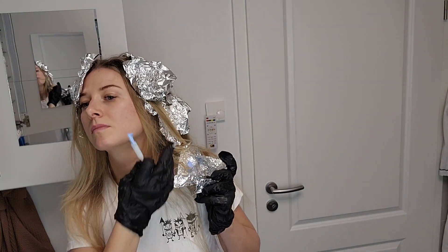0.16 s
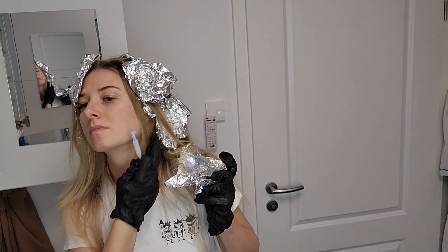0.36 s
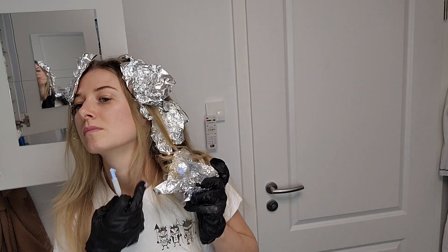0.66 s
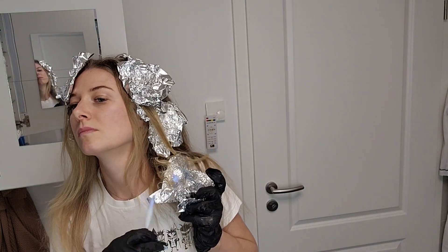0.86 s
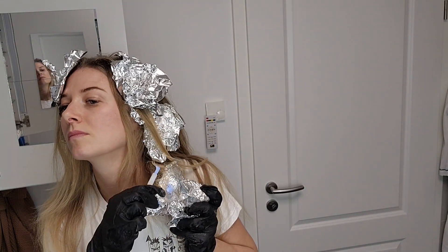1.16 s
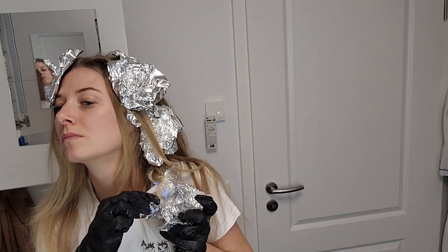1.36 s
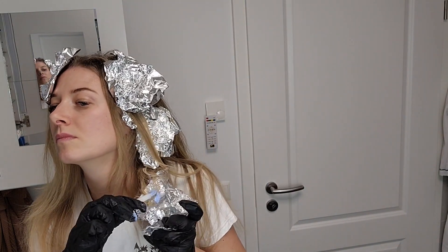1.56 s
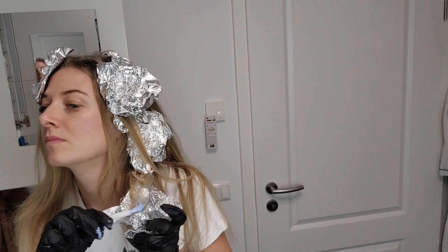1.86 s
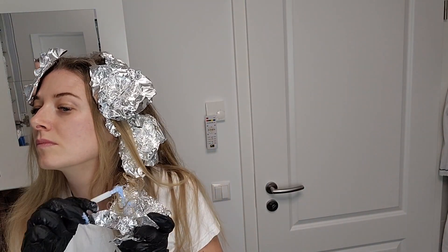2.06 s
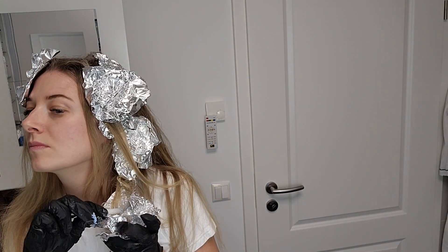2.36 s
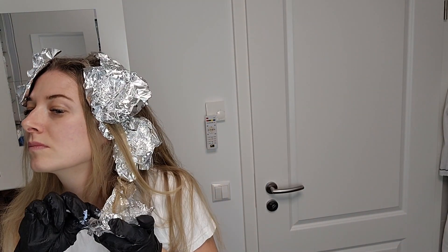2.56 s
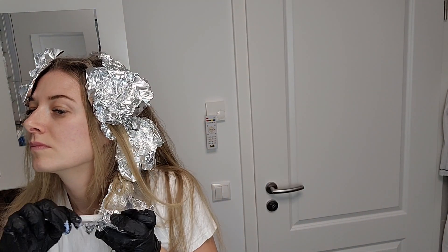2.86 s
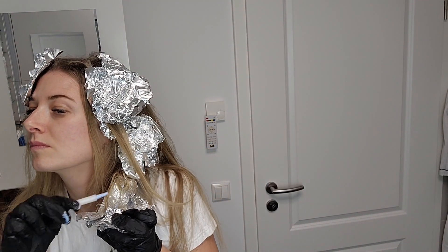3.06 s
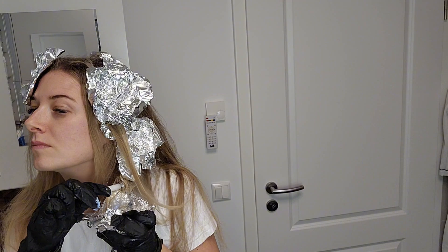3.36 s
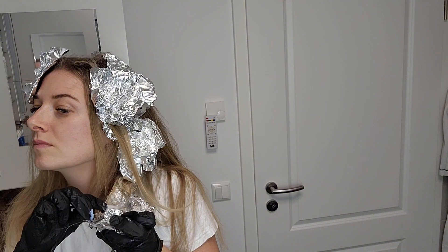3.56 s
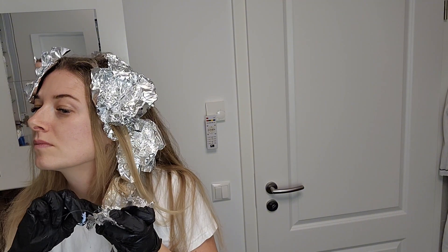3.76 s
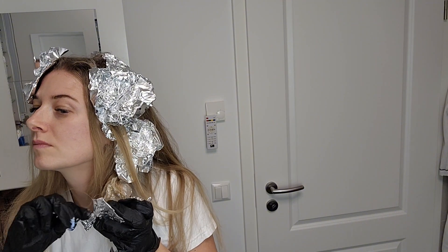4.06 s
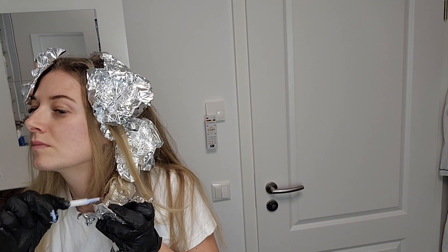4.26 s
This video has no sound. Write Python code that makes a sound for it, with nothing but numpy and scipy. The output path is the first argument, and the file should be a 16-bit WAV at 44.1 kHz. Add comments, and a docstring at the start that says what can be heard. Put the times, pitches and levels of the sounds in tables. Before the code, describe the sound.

Aluminium foil is folded by gloved fingers near the microphone. After one early crumple and a soft glove rustle, it falls almost silent; then crisp snaps start, build to a busy crackling peak, drop out briefly, and return in uneven bursts. Short room reflections, quiet air hiss, and a barely audible low hum at the very end.

```python
"""In a small bare room, gloved hands fold a crumpled aluminium foil packet.
Thousands of creases buckle: random clicks ring facets, wide ones popping low, fine wrinkles ticking high.
The sharpest snaps stand out alone as noise bursts; pressing fingers thud as lumpy low noise, and early on
a glove or sleeve rubs with a low soft rustle, made from the same broad folds and low noise.
A low sine hum swells twice at the end, the walls answer briefly in decaying noise, and quiet air hisses."""
import sys
import numpy as np
from scipy import signal
from scipy.fft import rfft, irfft
from scipy.io import wavfile
from scipy.ndimage import uniform_filter1d

SR = 44100
rng = np.random.default_rng(int(sys.argv[2]) if len(sys.argv) > 2 else 0)


def file_out(sig):
    """Save sig as 16-bit WAV at sys.argv[1]."""
    # one column per channel
    cols = np.atleast_2d(sig).T
    # limit, then scale
    lim = np.clip(cols, -1, 1)
    pcm = np.round(lim * 32767).astype(np.int16)
    wavfile.write(sys.argv[1], SR, pcm)


N = 195447
GESTURE_STEP = 64   # samples between two values of a gesture curve


def from_db(db):
    """Gain of a level in dB."""
    return 10 ** (np.asarray(db) / 20)


def rms_one(x):
    """Scaled to rms 1."""
    return x / np.sqrt(np.mean(x ** 2) + 1e-20)


def in_time(rows):
    """Columns of a curve table, joined by straight lines, one value a sample."""
    s, *columns = np.transpose(rows)
    t = np.arange(N) / SR
    return [np.interp(t, s, column) for column in columns]


def at_hz(points, hz):
    """A spectrum read on a log-frequency axis."""
    points_hz, values = np.transpose(points)
    return np.interp(np.log(hz), np.log(points_hz), values)


def drift(rate_hz):
    """Slow random wander with spread 1: noise through two equal low-pass poles, drawn every 40 samples."""
    step, settle = 40, 2000
    r = np.exp(-2 * np.pi * rate_hz * step / SR)
    noise = rng.standard_normal(N // step + 2 + settle)
    slow = signal.lfilter([1], [1, -2 * r, r * r], noise)[settle:]
    return np.interp(np.arange(N) / step, np.arange(len(slow)), rms_one(slow))


def band(x, low_hz, high_hz):
    """Butterworth band-pass."""
    edges_hz = [low_hz, min(high_hz, .45 * SR)]
    return signal.sosfilt(signal.butter(2, edges_hz, "band", fs=SR, output="sos"), x)


def air():
    """The quiet room and the microphone's own hiss: steady noise shaped by a spectrum."""
    # colour of the hiss: pitch_hz [Hz], level_db [dB per Hz, relative]
    air_colour = [(30, -5), (100, 6), (250, 2), (630, -6), (1200, -8.5), (2500, -5.5), (4500, -2),
                  (9000, -10.5), (13000, -16), (16000, -23)]
    level_db = -75.5   # rms
    hz = np.maximum(np.fft.rfftfreq(N, 1 / SR), 10)
    shaped = rfft(rng.standard_normal(N)) * from_db(at_hz(air_colour, hz))
    return from_db(level_db) * rms_one(irfft(shaped, N))


def swells(rows, rise_db_per_s):
    """Power of each gesture over time: a steady rise in dB, a hold, then its own fade in dB."""
    full_s, hold_s, fade_s = np.transpose(rows)[:3, :, None]
    t = np.arange(0, N + GESTURE_STEP, GESTURE_STEP) / SR
    rising_db = rise_db_per_s * (full_s - t)
    fading_db = 20 * (t - full_s - np.abs(hold_s)) / np.maximum(fade_s, .005)
    below_db = np.maximum(rising_db, fading_db)
    return from_db(-2 * np.clip(below_db, 0, 150))   # twice the dB turns gain into power


def per_sample(slow):
    """From gesture steps to every sample."""
    return np.interp(np.arange(N) / GESTURE_STEP, np.arange(len(slow)), slow)


def handling():
    """Overlapping gestures add in power; the louder a crumple, the more it pulls the busiest pitch."""
    # fingers crumple the foil: full_s [s at full strength], hold_s [s],
    # fade_s [s to fall 20 dB, 0.005 at least], middle_db [dB, middle creases],
    # fine_db, wide_db [dB against the middle creases], busy_hz [Hz, loudest facets]
    crumple_moves = [(0.0, 0.00087, 0.07, -46, -14, -22, 3000), (0.053, 0.0087, 0.17, -40, -20, -28, 2500),
                     (0.073, 0.0083, 0.0839, -35.5, -11.5, -19.5, 2370),
                     (0.115, 0.02, 0.34, -65, -9, -2, 3200), (0.295, .01, .03, -51, -3, -5, 4900),
                     (0.317, .01, .03, -36, -1.5, -4.5, 3180), (.33, 0.0011, 0.0541, -28.5, 0, -1.5, 2940),
                     (0.347, 0.05, 0.1549, -39.5, -2, -3.5, 3580),
                     (0.549, 0.056, 0.17, -50.5, -32, -30, 3400),
                     (0.727, 0.14, -0.1, -66.5, -8.5, -29, 3530),
                     (0.875, 0.068, 0.1, -64.5, -6.5, -28, 2400), (1.066, 0.024, 0.1, -66, -12, -14, 3940),
                     (1.162, .001, .03, -62, -12, -17, 3900), (1.186, .001, 0.2, -62, 16.5, -4, 8900),
                     (1.267, 0.011, 0.06, -51.5, 4.5, 4, 6600), (1.31, .025, .03, -61, 9.5, 9, 7660),
                     (1.355, 0.071, 0.96, -66, 9, -1.5, 7000), (1.437, 0.072, 0.12, -55, 8, -3.5, 7050),
                     (1.521, .01, -0.07, -44, 7, -2, 3500), (1.54, 0.00088, 0.05, -32.5, 4, -4, 3200),
                     (1.605, 0.057, 0.07, -50.5, 5, 1.5, 6840), (1.693, 0.034, 0.1, -46, 8.5, 3, 7200),
                     (1.74, .02, 0.05, -35.5, 2, 0.5, 6800), (1.761, .005, 0.0548, -27.5, -19, -3, 6900),
                     (1.819, 0.013, 0.0342, -36, -4, -0.5, 4640),
                     (1.856, 0.033, 0.07, -31, 1.3, -6.5, 4070), (1.982, 0.032, 0.03, -49, 8.5, -4.5, 7160),
                     (2.029, 0.059, 0.01, -52.5, 12, -2, 7200), (2.253, 0.0094, 0.11, -51.5, 7.5, 4, 4300),
                     (2.292, 0.1, 0.0262, -39.5, 4, -1.5, 4670), (2.381, 0.056, 0.0435, -31.5, 0, -1, 4140),
                     (2.443, 0.041, 0.0641, -28.5, 1.5, -5, 6700),
                     (2.507, 0.017, 0.0046, -32.5, 6, -3.5, 7200),
                     (2.542, 0.037, 0.0142, -38, -1, -5.5, 5800), (2.585, .001, 0.04, -28, -4, -4, 4300),
                     (2.61, .03, 0.2, -43, -3, 1.5, 5900), (2.65, 0.079, 0.08, -34, 1, -2.5, 5360),
                     (2.752, 0.052, 0.08, -35, 0.5, -2, 4900), (2.824, 0.059, 0.05, -36, 2.5, -4, 5470),
                     (2.936, 0.0016, 0.02, -30.5, 5, -3.5, 5500),
                     (2.951, 0.0013, 0.0759, -39, -4, -2.5, 4900), (3.1, 0.13, .05, -76, -10, -1, 3900),
                     (3.272, .025, 0.5, -64, -7.5, -6, 3800), (3.313, 0.041, -0.53, -56, 13.5, -7, 5600),
                     (3.339, 0.025, 0.14, -47.5, 7, -8.5, 6500), (3.385, .015, 0.05, -49, 1, -20, 6100),
                     (3.456, 0.0012, -0.25, -38.5, 8.5, -16, 5500),
                     (3.47, 0.029, 0.0347, -34.5, 3, 0.5, 3940), (3.57, .015, 0.45, -48, 1, -5, 4300),
                     (3.598, .01, 0.2, -35.5, -2, -6, 3750), (3.653, 0.043, 0.14, -36.5, -4, -1.5, 3660),
                     (3.693, 0.018, 0.15, -33.5, -2, -4, 4200), (3.764, 0.013, .1, -29.5, 2, 0, 5900),
                     (3.862, 0.014, 0.18, -46.5, 3, 0, 4150), (3.912, 0.027, 0.03, -41, 4, -15, 5300),
                     (3.946, 0.033, 0.01, -40, 5, -9.5, 4840),
                     (4.037, 0.025, -0.18, -43.5, 5.5, -9.5, 5300),
                     (4.072, 0.053, 0.0955, -31, -0.4, -7.5, 5400), (4.154, 0.011, 0.06, -32, 0, 3.5, 3720),
                     (4.192, 0.0057, 0.0751, -30, 3, -1.5, 4260), (4.236, .01, 0.06, -41.5, -7, 3, 5100),
                     (4.341, .006, 0.03, -40.5, -5, -5, 2460), (4.37, 0.037, .04, -61.5, -11, 1, 4160)]
    # a hand presses the packet; from 0.45 to 0.95 s a glove or sleeve rubs, a low soft rustle:
    # full_s [s at full strength], hold_s [s], fade_s [s to fall 20 dB, 0.005 at least],
    # broad_db [dB, broad folds], thud_db [dB, lumpy low noise]
    press_and_rub_moves = [(.0, 0.092, 0.6, -78, -76), (0.1, 0.013, 0.7, -66, -70),
                           (0.16, 0.14, 0.4, -87.5, -75), (0.321, 0.028, 0.07, -39.5, -47.5),
                           (0.397, .02, 0.07, -46.5, -51.5), (0.468, 0.12, -0.36, -55.5, -74),
                           (0.586, 0.091, 0.17, -54.5, -72), (0.713, 0.082, .17, -61.5, -87),
                           (1.31, 0.022, 0.18, -56.5, -78), (1.523, 0.012, 0.1554, -41, -56),
                           (1.763, 0.018, 0.03, -52, -60), (1.825, .001, 0.0454, -40, -68),
                           (1.858, 0.024, .065, -40.5, -62.5), (2.016, 0.026, 0.1, -60.5, -69),
                           (2.257, 0.018, 0.24, -58.5, -74), (2.293, 0.095, 0.22, -49, -63),
                           (2.38, .02, 0.13, -40, -45.5), (2.422, 0.044, 0.05, -31, -44),
                           (2.549, .04, 0.03, -43.5, -55), (2.65, 0.055, 0.09, -44.5, -62.5),
                           (2.76, .1, 0.02, -47.5, -70), (2.927, 0.017, 0.1051, -41, -43.5),
                           (3.476, 0.033, .045, -39.5, -50.5), (3.558, 0.026, 0.24, -57, -61),
                           (3.613, 0.038, 0.04, -51.5, -72), (3.658, 0.026, 0.2, -50, -56),
                           (3.715, 0.0073, 0.09, -43, -41), (3.77, 0.014, 0.11, -42, -65),
                           (4.08, 0.16, 0.05, -51, -75)]
    crumple = swells(crumple_moves, rise_db_per_s=1399.5)
    press_or_rub = swells(press_and_rub_moves, rise_db_per_s=1602)
    middle_db, fine_db, wide_db, hz = np.transpose(crumple_moves)[3:]
    broad_db, thud_db = np.transpose(press_and_rub_moves)[3:]

    middle = from_db(2 * middle_db) @ crumple
    fine = from_db(2 * (middle_db + fine_db)) @ crumple
    wide = from_db(2 * (middle_db + wide_db)) @ crumple
    # every crumple stirs the broad folds a little, every fold thuds a little
    broad = from_db(2 * broad_db) @ press_or_rub + from_db(2 * -24.5) * wide
    thud_swell = press_or_rub ** (1 / .7)   # the low noise fades in 0.7 of the time
    thud = from_db(2 * thud_db) @ thud_swell + from_db(2 * -24) * broad

    busy_hz = np.exp((np.log(hz) * from_db(2 * middle_db)) @ crumple / middle)
    gains = [per_sample(np.sqrt(power)) for power in (middle, broad, wide, fine, thud)]
    return gains + [per_sample(busy_hz)]


def ring(clicks, hz, t60):
    """A resonator: a unit click sets a sine of height 1 ringing, down 60 dB after t60 seconds."""
    r = from_db(-60 / (t60 * SR))
    w = 2 * np.pi * hz / SR
    return signal.lfilter([0, np.sin(w)], [1, -2 * r * np.cos(w), r * r], clicks + 1e-18)


def creases(spectrum, per_s, uneven_db, cycles, clump_db, patchy_db, clumps, grit, busy_hz, count=20):
    """Bucklings of uneven size come at random in clumps; each rings one facet, 60 dB down after some cycles."""
    size_db = grit * uneven_db * np.minimum(rng.exponential(1, N), 4.5)
    sizes = from_db(size_db) * rng.choice([-1, 1], N)
    # low grit, a sliding glove: many more contacts, evenly sized and spread
    rate = per_s * from_db(grit * clump_db * clumps + 16 * (1 - grit))
    born = rng.random(N) < rate / SR
    lowest_hz, highest_hz = spectrum[0][0], spectrum[-1][0]
    pitches = np.geomspace(lowest_hz, highest_hz, count)
    dealt = rng.integers(0, count, N)
    out = 0
    for k, hz in enumerate(pitches):
        # facets form and vanish as the sheet moves
        facet = from_db(at_hz(spectrum, hz) + patchy_db * drift(7.1))
        # the facets under the fingers ring loudest
        facet *= from_db(4.9 * np.exp(-(np.log(hz / busy_hz) / 0.22) ** 2))
        ringing = rms_one(ring(sizes * born * (dealt == k), hz, cycles / hz))
        out = out + facet * np.sqrt(hz) * ringing   # bandwidth grows with pitch
    # a small facet radiates little below its own pitch
    out = signal.sosfilt(signal.butter(4, lowest_hz, "high", fs=SR, output="sos"), out)
    # levelled over a sixth of a second: the hand sets the loudness
    return out / np.sqrt(uniform_filter1d(out ** 2, size=SR // 6) + 1e-12)


def thuds(gain):
    """Lumpy low noise: fingers flex the whole sheet, and a glove or sleeve rubs softly."""
    low_noise = band(band(rng.standard_normal(N), 75, 186), 60, 440)
    return gain * from_db(5.5 * drift(23)) * rms_one(low_noise)


def foil_and_hands():
    """Four sizes of crease and the low noise follow the hands; neighbours of every size buckle in clumps."""
    # facet spectra, from broad folds to fine wrinkles: pitch_hz [Hz], level_db [dB, relative]
    broad_folds = [(260, -12.5), (380, 2), (550, 3), (800, 2), (1100, -14.5)]
    wide_facets = [(650, -5.5), (900, -3), (1300, 0), (1700, -8.5), (2400, -16.5)]
    middle_creases = [(1600, 9), (2100, 0.5), (2800, 4), (3600, 6), (5000, 0), (7000, -3)]
    fine_wrinkles = [(4500, -14.5), (6500, 1.5), (8000, 2.5), (11000, 3), (14000, -1.5), (16000, 3)]
    # kind of contact: time_s [s], grit [0 glove slides - 1 foil buckles]
    contact = [(0, 0.2), (.3, 0.33), (.45, 0.24), (1.0, 0.25), (1.15, 0.84), (1.9, 0.67), (2.1, 0.51),
               (2.3, 0.68), (2.9, 0.72), (3.0, 0.35), (3.3, 0.77), (3.5, 0.42), (3.6, 0.78), (4.25, 0.68),
               (4.43, 0.81)]
    middle, broad, wide, fine, thud, busy_hz = handling()
    # one crease giving way sets off its neighbours
    shared = dict(clumps=drift(30), grit=in_time(contact)[0], busy_hz=busy_hz)
    foil = broad * creases(broad_folds, per_s=900, uneven_db=2.5, cycles=21.0,
                           clump_db=2.5, patchy_db=0.5, count=12, **shared)
    foil += wide * creases(wide_facets, per_s=1200, uneven_db=-0.5, cycles=10.5,
                           clump_db=5.0, patchy_db=1.0, count=14, **shared)
    foil += middle * creases(middle_creases, per_s=2500, uneven_db=4.5, cycles=16.0,
                             clump_db=4.0, patchy_db=3.0, **shared)
    foil += fine * creases(fine_wrinkles, per_s=3000, uneven_db=4.0, cycles=22.0,
                           clump_db=4.5, patchy_db=3.5, **shared)
    return foil + thuds(thud)


def room(x):
    """Dense echoes: octave bands of noise, each dying with its own t60, after a first gap."""
    # reverberation time: pitch_hz [Hz], t60_s [s to fall 60 dB]
    room_decay = [(100, 0.057), (500, 0.12), (2000, 0.15), (6000, 0.28), (15000, 0.22)]
    t = np.arange(SR // 2) / SR
    tail = 0
    for low_hz in 60 * 2. ** np.arange(9):
        t60 = at_hz(room_decay, 1.4 * low_hz)
        tail = tail + band(rng.standard_normal(len(t)), low_hz, 2 * low_hz) * from_db(-60 * t / t60)
    tail = tail * np.clip((t - .003) / 0.0038, 0, 1)   # silent for 3 ms, then fades in
    return signal.fftconvolve(x, tail / np.sqrt(np.sum(tail ** 2)))[:N]


def snaps():
    """Each snap is a short burst around the pitch of its facet, a treble crack and a low pop."""
    # single snaps: start_s [s], peak_db [dB, facet and crack before the low cut], pitch_hz [Hz, facet],
    # crack_db [dB against the facet], pop_db [dB, pop before the low cut]
    snap_list = [(0.1504, -47, 2440, -17, -64), (0.1743, -45, 4150, -19.0, -67.0),
                 (0.251, -41.5, 5000.0, -21, -53), (0.295, -33.5, 4830, -16, -42),
                 (0.3128, -25, 3180, -14, -29), (0.578, -32.5, 4000.0, -22, -54),
                 (1.0646, -48, 5130, -18, -67), (1.1505, -52, 5200.0, -17, -64),
                 (1.1829, -33, 8650, -10, -58), (1.1885, -28.5, 9100, -10, -65.0),
                 (1.2605, -27.5, 1180, 7, -36.5), (1.3129, -31, 8500, 5, -39), (1.3728, -27, 7540, 1, -57),
                 (1.3775, -32, 13300.0, -5, -73.0), (1.3921, -23, 6200.0, 15, -47),
                 (1.4057, -36, 7900, -7, -57), (1.414, -34, 8300.0, -6, -62.0),
                 (1.437, -20.5, 6400, 9.5, -48), (1.4675, -30, 10900.0, -8, -53),
                 (1.4765, -24, 8800, 2, -54), (1.5176, -25, 12800.0, -2, -42.0),
                 (1.5394, -13.5, 1880, 6.5, -21.5), (1.5682, -12.5, 8550, 1.5, -48),
                 (1.6084, -32, 3170, -9, -44), (1.642, -17.5, 10100, -1.5, -29),
                 (1.752, -28, 6850, -8, -31), (1.756, -19.5, 1260, 11, -24), (1.763, -5, 7150, -2, -21),
                 (1.7674, -14, 6800, 17, -22), (1.7894, -6, 7200, 8, -29), (1.8823, -14, 10900, -3, -80.0),
                 (1.916, -19, 9900, -15, -80.0), (1.981, -24, 3450, 2, -38.5),
                 (1.9953, -25, 7600, -11, -41), (2.2815, -18.5, 13100, 6.5, -35),
                 (2.291, -19.5, 4150, -14, -50.5), (2.386, -5.5, 12200, -6, -32),
                 (2.4192, -18, 2100.0, -5, -14.5), (2.4413, -18, 4050, -10.0, -16),
                 (2.4539, -7, 7750, -11, -22), (2.458, -11.5, 4080, -6, -31),
                 (2.506, -3.5, 9500, -1, -80.0), (2.5146, -8, 14000.0, -8, -31),
                 (2.531, -12.5, 7900, -14, -30), (2.5407, -23.5, 8100.0, -8, -26.5),
                 (2.566, -10.5, 7200, -4, -30), (2.5827, -14, 1380, 0.5, -21),
                 (2.6066, -9.5, 9250, -19, -46), (2.6258, -11, 9800, -2.0, -33),
                 (2.6293, -12.5, 11900.0, -6, -30), (2.6336, -21, 9600.0, -6.5, -29),
                 (2.642, -24, 8400.0, -15, -79), (2.6534, -16, 10000.0, 0, -80.0),
                 (2.66, -8.5, 9100, -1, -28), (2.6996, -13, 3630, -0.5, -38), (2.706, -8, 10600, -18, -47),
                 (2.7238, -0.5, 13600, -6, -75), (2.7503, -20, 1360, -6, -33),
                 (2.8959, -10, 6300, -2, -80.0), (2.933, -25, 5500, -14, -17.5),
                 (2.9366, -19, 5650, -6.5, -28.5), (3.1014, -48.5, 3010, -3, -67.5),
                 (3.272, -44, 3770, -24.0, -62.5), (3.3023, -27, 3900, 2, -64.5),
                 (3.3194, -31, 10300, -3.0, -51), (3.3418, -18.5, 10900, 1, -64),
                 (3.346, -13, 9450, 2.5, -59), (3.3732, -29, 9900.0, -4, -56),
                 (3.3923, -19, 10200.0, 0, -56), (3.3961, -15.5, 13100, 2, -69.0),
                 (3.3989, -18, 6450, 15, -63.0), (3.402, -26, 6160, 5, -69.0),
                 (3.4378, -20.5, 7000, 7, -64.5), (3.4413, -25, 4200, -3, -67),
                 (3.4713, -25, 1350, 1, -17.5), (3.568, -34, 8400.0, -7.0, -53.0),
                 (3.632, -20, 3940, 0, -40), (3.6575, -13.5, 3300, -12, -25), (3.669, -10, 6900, 3, -40),
                 (3.698, -21, 2660, -10.5, -23), (3.7143, -11, 10100, 2, -37),
                 (3.7262, -19, 7650, -14, -80.0), (3.7573, -11.5, 9800, 0, -30),
                 (3.8223, -12.5, 10000, -9, -30), (3.834, -10.5, 10300.0, 2, -36),
                 (3.88, -10, 3000, 6, -40), (3.8975, -22.5, 7900, -2, -48),
                 (3.943, -14.5, 10400, 11, -53.5), (3.9509, -15, 13300, -7, -50),
                 (4.0123, -23, 9200, 14, -46), (4.0343, -23, 3760, 2, -52), (4.0549, -24, 3950, 0, -49),
                 (4.0675, -9, 13100, -5, -41), (4.1935, -11, 4470, 1, -25), (4.2171, -14, 1460, 3.5, -40.5),
                 (4.2435, -15.5, 1370, 12, -43), (4.3366, -27.5, 1310, -10.5, -56),
                 (4.3405, -25.5, 1950, -13.5, -46)]
    length = 2048
    t = np.arange(length) / SR
    # 0.3 ms attack, a fast fall and a faint slower one
    fall = (from_db(-60 * t / .005) + .12 * from_db(-60 * t / .04)) * np.minimum(t / .0003, 1)
    pop_fall = from_db(-60 * t / 0.0045)
    out = np.zeros(N + length)
    noises = rng.standard_normal((len(snap_list), 3, length))
    for (start_s, peak_db, hz, crack_db, pop_db), hiss in zip(snap_list, noises):
        facet = band(hiss[0] * fall, 0.82 * hz, 1.217 * hz)
        crack = band(hiss[1] * fall, 3840, 14400)
        tick = facet / np.abs(facet).max() + from_db(crack_db) * crack / np.abs(crack).max()
        pop = band(hiss[2] * pop_fall, 330, 1490)
        at = round(start_s * SR)
        out[at:at + length] += from_db(peak_db) * tick / np.abs(tick).max()
        out[at:at + length] += from_db(pop_db) * pop / np.abs(pop).max()
    return signal.sosfilt(signal.butter(2, 300, "high", fs=SR, output="sos"), out[:N])


def hum():
    """A soft low sine that swells twice, its pitch wavering slightly."""
    # path of the hum: time_s [s], pitch_hz [Hz], level_db [dB rms]
    hum_path = [(4.17, 139, -67), (4.172, 138, -82), (4.194, 147, -68), (4.272, 140, -54), (4.32, 145, -68),
                (4.346, 139, -54), (4.43, 138, -88)]
    hz, level_db = in_time(hum_path)
    t = np.arange(N) / SR
    fade_in = np.clip((t - hum_path[0][0]) / .03, 0, 1)
    tone = np.sin(2 * np.pi * np.cumsum(hz) / SR)
    return np.sqrt(2) * from_db(level_db) * fade_in * tone


def scene():
    """Foil, hands and snaps with the room's answer, over the hum and the air."""
    foil = foil_and_hands()
    sharp = snaps()
    wet = room(from_db(-10) * foil + from_db(-11) * sharp)   # sends to the room, dB
    return (foil + sharp + wet + hum() + air())[None]


def record(dry):
    """The bass is rolled off below 50 Hz and the top is cut steeply above 15.8 kHz."""
    dry = signal.sosfilt(signal.butter(2, 50, "high", fs=SR, output="sos"), dry)
    return signal.sosfilt(signal.ellip(10, .5, 70, 15800, fs=SR, output="sos"), dry)


dry = scene()
out = record(dry)
file_out(out)
```